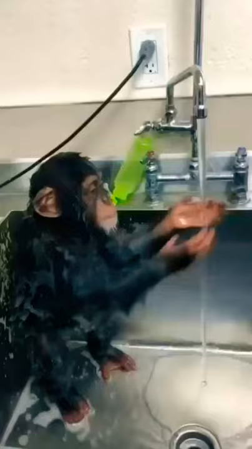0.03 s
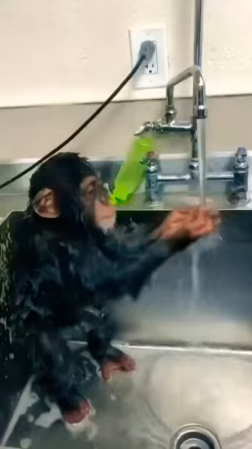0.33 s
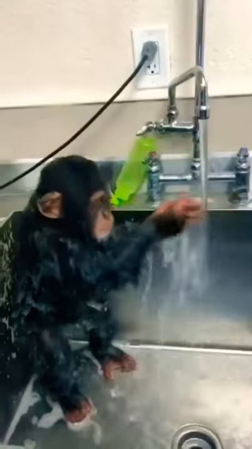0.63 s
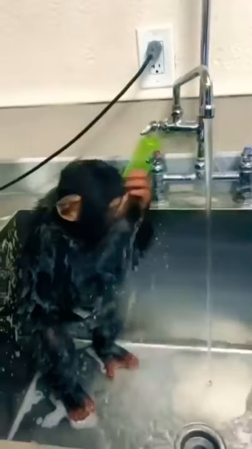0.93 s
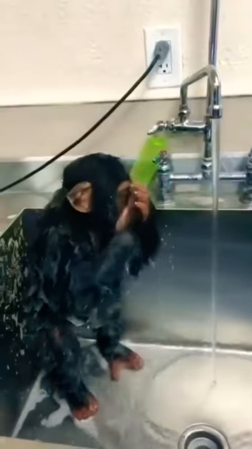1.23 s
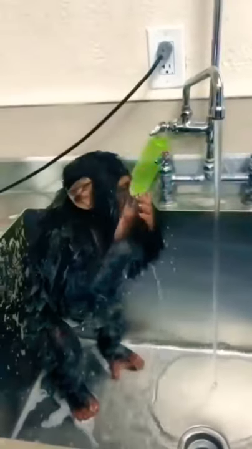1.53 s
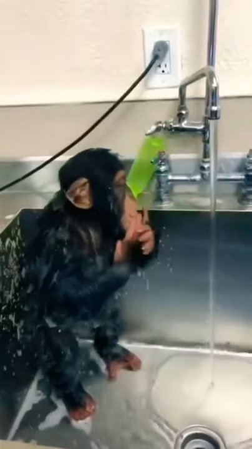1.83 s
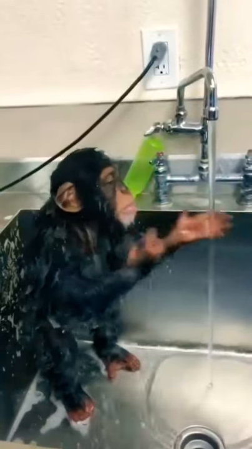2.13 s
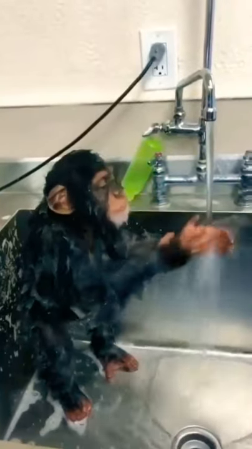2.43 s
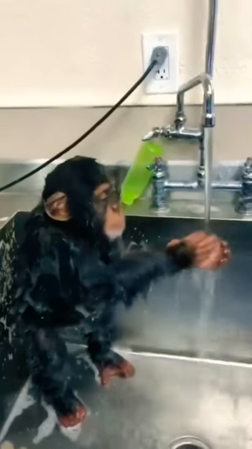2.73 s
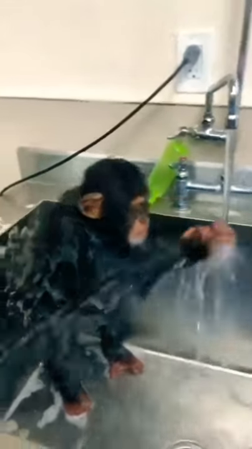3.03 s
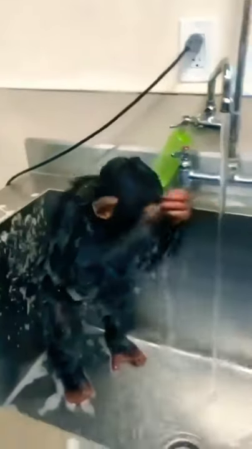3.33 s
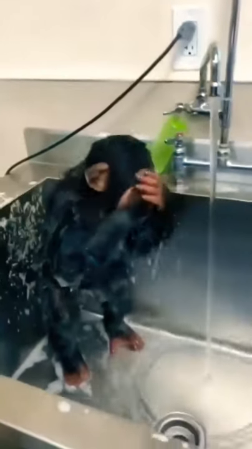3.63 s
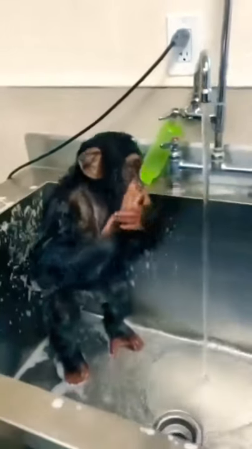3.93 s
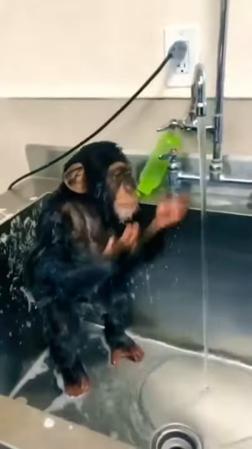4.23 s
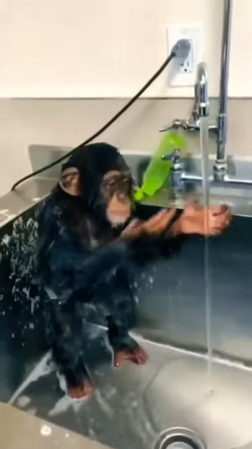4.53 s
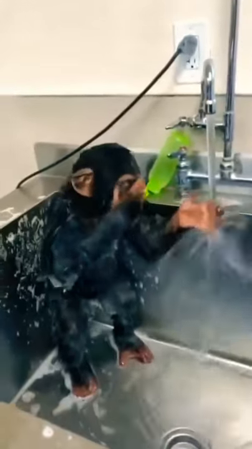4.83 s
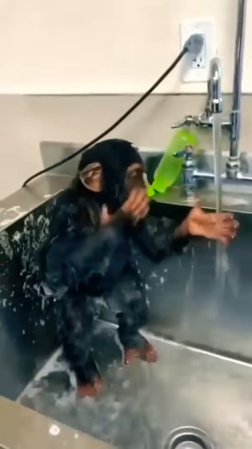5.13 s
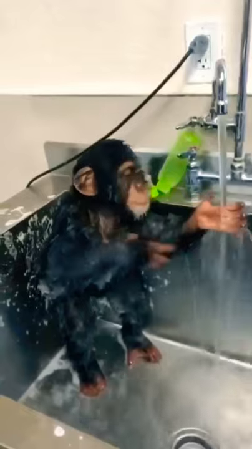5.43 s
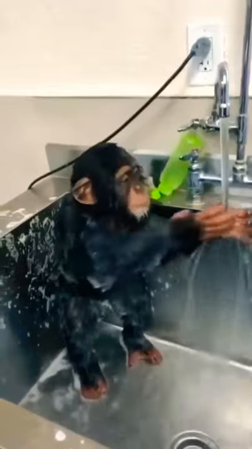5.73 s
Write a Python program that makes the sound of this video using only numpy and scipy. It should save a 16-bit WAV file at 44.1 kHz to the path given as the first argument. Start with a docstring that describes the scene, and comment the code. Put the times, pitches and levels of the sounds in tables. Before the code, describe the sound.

After a brief silence, running tap water starts abruptly at about 0.2 seconds, trickling and gurgling into a large steel sink over a low drumming from the basin. From 0.4 to 1.2 seconds hands break the stream: spray hisses and water patters and thumps on the metal, with sharp plops and a slap around 1 second. The flow then runs more quietly with scattered drips. A second bout of splashing comes from 2.6 to 3.6 seconds, with stronger bubbling, wet splats and booming thuds. Between 3.8 and 5 seconds the water is softer, with small plops and a hollow, wavering gurgle in cupped palms. More splashes and patter follow from 5 seconds to about 5.8, with the tap still running. Everything sounds close, in a small hard room that rings briefly.

```python
"""Tap water drums and trickles in a big steel sink, where a young chimpanzee washes its hands and face.
The stream shakes the basin into a low boom and beats in air bubbles that gurgle in the puddle and in
cupped palms. Whenever the hands break the stream up, spray hisses and falling water patters on the
steel, with plops and splats in between. A small hard room rings briefly."""
import sys
import numpy as np
from scipy import signal
from scipy.io import wavfile
from scipy.ndimage import uniform_filter1d

SR = 44100
rng = np.random.default_rng(int(sys.argv[2]) if len(sys.argv) > 2 else 0)


def generate_wav(sig):
    """Save sig (samples, or channels by samples) to the path in sys.argv[1] as 16-bit PCM at SR."""
    pcm = np.round(np.clip(np.atleast_2d(sig).T, -1, 1) * 32767).astype(np.int16)
    wavfile.write(sys.argv[1], SR, pcm)


N = 254456
TIME = np.arange(N) / SR

# how long the room rings: (frequency [Hz], time to fade by 60 dB [s])
ROOM_RING = [(100, 0.045), (1000, 0.34), (4000, 0.37), (13000, 0.15)]
# ringing tones of the steel basin and its wet bottom panel: (pitch [Hz], width [Hz], relative level [dB])
BASIN_TONES = [(60.3, 29, -22), (81.5, 25, -21), (105.7, 18, 1), (120.8, 24, -2), (130.4, 14.4, -4),
               (145.5, 7.5, -2.5)]
PANEL_TONES = [(138.7, 22, 5), (177, 51, -22), (203, 20, 3.5), (234.3, 4.1, 0.5), (282.4, 27, -2),
               (334.3, 19.5, -0.5), (382, 11.6, -8), (475.5, 12, -3.5), (521.4, 5.7, -4.5), (596, 21, -7.5),
               (737.7, 11.7, -3)]
# tones of the hollow between hands and sink: (pitch [Hz], width [Hz], relative level [dB])
HOLLOW_TONES = [(1310, 110, 0.5), (1780, 93, -1), (1960, 86, -1.5), (2760, 150, 0.5)]
# how loudly that hollow rings: (time [s], level [dB])
HOLLOW_LEVEL = [(3.6, -70), (3.85, -46), (4.3, -41.5), (4.75, -38), (4.95, -38.5), (5.1, -60)]
# tone colour of each water sound: (frequency [Hz], relative level [dB])
TRICKLE_COLOUR = [(150, -30), (450, 2.5), (900, 4), (1500, -1.5), (2400, 0), (3700, -10), (5000, -9),
                  (7000, -23.5), (9000, -10), (13000, -38)]
GURGLE_COLOUR = [(200, -31), (600, -1.5), (900, -2.5), (1300, -0.5), (1900, 2), (2350, -4.5), (2850, -8),
                 (3600, -3.5), (5000, -15.5), (13000, -10.5)]
SPLAT_COLOUR = [(750, -15), (3000, 0.5), (5500, 0.5), (9000, 0), (13000, -3)]
THUMP_COLOUR = [(60, -37), (105, -5), (145, 0.5), (220, -5.5), (330, -13), (1000, -56)]
PATTER_COLOUR = [(25, -15), (100, -4), (190, -11), (350, 0.5), (450, -3.5), (800, -7), (1200, -5),
                 (2500, -22), (6000, -36)]
SPRAY_COLOUR = [(150, -37.5), (700, -8), (1500, -33.5), (2500, -1), (3600, -5.5), (4500, -4), (6000, -3.5),
                (7200, -4.5), (8700, -4), (10500, -5), (13000, -8.5)]
# how hard the stream churns the puddle or the palms: (time [s], relative level [dB])
CHURN_LEVEL = [(0.3, -39.5), (1.15, -34.5), (1.55, -38), (2.1, -40), (2.58, -33), (2.75, -31), (3.2, -32),
               (3.55, -28.5), (3.95, -34.5), (4.45, -39), (4.85, -37.5), (5.1, -34), (5.5, -32),
               (5.75, -37.5)]
# the air pocket that the stream drives into the water: (time [s], pitch [Hz], relative level [dB])
AIR_POCKET = [(0.7, 1380, 5), (1.3, 1610, -36), (1.8, 1330, 13), (2.45, 1400, -21), (2.6, 1030, -5),
              (2.76, 1140, 9), (3.02, 1157, 6), (3.22, 1250, 6), (3.45, 1410, -7), (3.8, 1190, 2.5),
              (4.5, 1350, -7), (4.85, 1230, 2.5), (5.7, 1560, -15)]
# the hands catch the stream and keep it off the basin: (start [s], length [s])
CATCHES = [(0.757, 0.084), (2.82, 0.17), (3.09, 0.07), (5.182, 0.2)]
# large bubbles closing: (time [s], peak level [dB], first pitch [Hz], length [s], pitch rise [share])
PLOPS = [(0.8772, -15, 1570, 0.004, 0.57), (0.9101, -5, 1880, 0.0025, 0.39),
         (0.9113, -5, 3360, 0.0024, 0.21), (0.979, -21, 1350, 0.011, 0.17),
         (1.342, -21, 1450, 0.0055, 0.22), (1.509, -23, 2600, 0.0043, 0.1), (1.715, -28.5, 920, 0.012, 0.1),
         (1.765, -39, 775, 0.013, 0.11), (1.846, -34.5, 445, 0.022, 0.11), (2.005, -27, 3700, 0.0043, 0.11),
         (2.112, -33.5, 1830, 0.03, 0.29), (2.2, -28, 2050, 0.0066, 0.15), (2.204, -23, 1110, 0.009, 0.18),
         (2.366, -30, 2690, 0.018, 0.14), (2.394, -24, 2890, 0.0043, 0.15),
         (2.4032, -15, 1230, 0.0071, 0.46), (2.479, -21, 1510, 0.0073, 0.12),
         (2.5545, -24, 940, 0.013, 0.1), (2.646, -23, 1450, 0.0097, 0.11), (2.663, -28, 974, 0.013, 0.08),
         (2.719, -23, 1120, 0.019, 0.087), (2.912, -23, 2980, 0.0064, 0.083),
         (2.975, -20.5, 1115, 0.021, 0.091), (3.01, -24, 1040, 0.013, 0.1),
         (3.1823, -11, 2710, 0.0018, 0.41), (3.241, -17.5, 4680, 0.006, 0.1),
         (3.256, -16, 1350, 0.0045, 0.22), (3.27, -26, 5000, 0.0046, 0.1),
         (3.39, -20.5, 1364, 0.017, 0.047), (3.4322, -9.5, 3030, 0.0036, 0.2),
         (3.494, -20.5, 1547, 0.019, 0.06), (3.527, -10.5, 2880, 0.003, 0.35),
         (3.565, -19.5, 1084, 0.01, 0.18), (3.605, -15, 3180, 0.0027, 0.2), (3.768, -30, 1200, 0.021, 0.05),
         (3.811, -22, 1193, 0.017, 0.091), (3.824, -17, 1780, 0.0086, 0.21),
         (3.838, -26, 1037, 0.011, 0.089), (3.915, -33, 2620, 0.011, 0.036),
         (4.002, -36, 1930, 0.012, 0.08), (4.02, -29, 1190, 0.017, 0.08), (4.121, -23, 1600, 0.008, 0.097),
         (4.126, -29, 1950, 0.012, 0.08), (4.168, -30, 1545, 0.016, 0.26),
         (4.209, -26.5, 1240, 0.012, 0.13), (4.36, -32, 1190, 0.014, 0.08),
         (4.512, -27, 6300, 0.0028, 0.08), (4.574, -19, 1520, 0.006, 0.26), (4.58, -22, 1370, 0.0068, 0.11),
         (4.5855, -18, 1770, 0.0046, 0.2), (4.722, -26, 1255, 0.022, 0.08),
         (4.742, -21.5, 2695, 0.0084, 0.12), (4.773, -31, 2680, 0.0065, 0.05),
         (4.795, -28, 1696, 0.033, 0.091), (4.819, -27.5, 1073, 0.03, 0.25),
         (5.4073, -10.5, 2480, 0.003, 0.27), (5.411, -16, 4660, 0.0019, 0.1),
         (5.4142, -7, 3470, 0.0016, 0.2), (5.43, -19.5, 1800, 0.0069, 0.37),
         (5.6055, -21, 1650, 0.01, 0.12), (5.6125, -11, 5000, 0.002, 0.1)]
# water slapping on skin and steel: (time [s], level [dB], time to fade by 60 dB [s])
SPLATS = [(0.541, -19.5, 0.026), (0.688, -18, 0.076), (0.714, -24, 0.093), (1.0063, -7, 0.042),
          (1.021, -17.5, 0.13), (1.046, -13.5, 0.028), (1.138, -14.5, 0.039), (1.2356, -29, 0.023),
          (1.271, -24, 0.027), (1.305, -24, 0.079), (1.4711, -24, 0.04), (1.57, -24, 0.018),
          (1.757, -31, 0.04), (2.0, -38, 0.38), (2.214, -35, 0.04), (2.465, -34, 0.098),
          (2.685, -21, 0.066), (2.756, -26, 0.15), (2.823, -14.5, 0.031), (2.909, -14, 0.05),
          (2.94, -17, 0.06), (2.97, -16, 0.082), (2.988, -20.5, 0.09), (3.0294, -26, 0.021),
          (3.0586, -31, 0.038), (3.089, -16.5, 0.04), (3.1775, -19, 0.04), (3.242, -23, 0.1),
          (3.473, -12.5, 0.035), (3.6022, -18, 0.04), (3.645, -14.5, 0.039), (3.7245, -12, 0.012),
          (3.7684, -30, 0.04), (3.8472, -27, 0.057), (3.9325, -25.5, 0.037), (4.082, -26, 0.044),
          (4.0994, -29.5, 0.03), (4.1565, -29.5, 0.05), (4.219, -30, 0.11), (4.3136, -27.5, 0.022),
          (4.5441, -28, 0.033), (4.619, -26, 0.044), (4.727, -26.5, 0.061), (4.825, -31.5, 0.12),
          (4.9795, -14.5, 0.024), (5.2709, -24, 0.027), (5.3757, -23.5, 0.27), (5.407, -12, 0.03),
          (5.426, -14, 0.077), (5.442, -25, 0.046), (5.571, -21, 0.065), (5.6016, -18, 0.062)]
# handfuls spilling into the sink: (start [s], rise [s], length [s], spray [dB], patter [dB], boom [dB])
SPILLS = [(0.343, 0.12, 0.15, -33, -71, -33.5), (0.5, 0.085, 0.25, -29, -35.5, -46),
          (0.812, 0.014, 0.029, -24.5, -43, -49), (0.848, 0.067, 0.23, -26.5, -33.5, -30),
          (1.187, 0.022, 0.088, -35.5, -41, -52), (1.668, 0.022, 0.069, -38.5, -40.5, -119),
          (2.638, 0.096, 0.17, -28.5, -33.5, -43), (2.823, 0.066, 0.25, -27, -37.5, -52),
          (3.151, 0.027, 0.13, -28.5, -39.5, -55), (3.293, 0.031, 0.19, -26.5, -35.5, -30),
          (3.447, 0.03, 0.12, -29.5, -35, -24.5), (4.974, 0.023, 0.13, -26, -29.5, -38),
          (5.197, 0.011, 0.43, -34, -41, -59), (5.412, 0.018, 0.063, -28, -33.5, -43),
          (5.559, 0.02, 0.19, -24.5, -31, -38)]


def gain_of(db):
    """Turns decibels into a factor to multiply by."""
    return 10 ** (np.asarray(db) / 20)


def evened(x):
    """Scales a sound to an average power of 1."""
    return x / np.sqrt(np.mean(x ** 2) + 1e-20)


def read(points, hz):
    """Looks up a table by frequency, spacing the octaves evenly."""
    f, value = np.transpose(points)
    return np.interp(np.log(hz + 1), np.log(f + 1), value)


def curves(rows):
    """Joins the points of a time table into one curve per column."""
    s, *columns = np.transpose(rows)
    return [np.interp(TIME, s, c) for c in columns]


def add(mix, s, sound):
    """Mixes a sound in at time s."""
    part = mix[round(s * SR):][:len(sound)]
    part += sound[:len(part)]


def colour(x, points, size=2048):
    """Gives a sound a tone colour while clicks keep their sharp front."""
    log_gain = np.log(gain_of(read(points, abs(np.fft.fftfreq(size, 1 / SR)))))
    taps = np.fft.ifft(np.exp(np.conj(signal.hilbert(log_gain)))).real
    return evened(signal.oaconvolve(x, taps)[:len(x)])


def ring(x, hz, width, skirt_hz):
    """Makes x ring at a fixed or moving pitch; a second, wider filter trims the sound to either side."""
    turn = np.exp(2j * np.pi * np.cumsum(hz * np.ones(len(x))) / SR)
    for band_hz in (width, skirt_hz):
        decay = np.exp(-np.pi * band_hz / SR)
        x = 2 * (turn * signal.lfilter([1 - decay], [1, -decay], x / turn + 1e-18)).real
    return evened(x)


def impacts(per_s, spread_db):
    """Tiny blows at random times; with a positive spread, most are small and a few are large."""
    size = gain_of(spread_db * np.minimum(rng.exponential(1, N), 4))
    return size * rng.choice([-1, 1], N) * (rng.random(N) < per_s / SR)


def bubble(hz, length, rise):
    """A dying tone whose pitch climbs as the bubble nears the surface."""
    t = np.arange(0, length, 1 / SR)
    fade = gain_of(-60 * t / length) * (1 - np.exp(-2 * hz * t))
    return fade * np.sin(2 * np.pi * hz * (t + rise * t * t / length / 2))


def bubbles(low_hz, high_hz, count, spread_db, cycles, rise):
    """A cloud of bubbles of random sizes, each ringing for about so many cycles."""
    out = np.zeros(N)
    for when, size, strength, damping in rng.random((count, 4)):
        hz = low_hz * (high_hz / low_hz) ** size
        db = -spread_db * np.log(max(strength, .02))
        length = cycles * 2 ** (damping - .5) / hz
        add(out, when * N / SR, gain_of(db) * hz * bubble(hz, length, rise))
    return evened(out)


def steel(tones, skirt):
    """Falling water shakes the steel sheet, which rings at its own pitches."""
    return evened(sum(gain_of(db) * ring(rng.standard_normal(N), hz, width, skirt * width)
                      for hz, width, db in tones))


def echoes(walls_db=-6, wall_s=0.011, tail_db=-8):
    """The direct sound from one spot, close echoes off the sink walls, then the room's short tail."""
    t = np.arange(SR // 3) / SR
    signs = rng.choice([-1., 1.], (2, len(t)))
    near, far = signs * (rng.random((2, len(t))) < 2000 / SR) * (t > .002)
    near = near * np.exp(-t / wall_s)
    hz, frame_s, bands = signal.stft(far, SR, nperseg=256)
    fade = gain_of(-60 * frame_s / read(ROOM_RING, hz)[:, None])
    far = signal.istft(bands * fade, SR)[1][:len(t)]
    walls = gain_of(walls_db) * near / np.linalg.norm(near)
    tail = gain_of(tail_db) * far / np.linalg.norm(far)
    paths = (t == 0) + walls + tail
    return paths / np.linalg.norm(paths)


def room(x, spots=8, stay_samples=768):
    """Water lands on several spots in turn, each with its own echoes."""
    spot = np.arange(N) // stay_samples % spots
    shares = (uniform_filter1d(1. * (spot == k), stay_samples // 4) for k in range(spots))
    return sum(signal.oaconvolve(x * share, echoes())[:N] for share in shares)


def trickle(crackle_db=-45.5, spit_db=-56, hiss_db=-54, ping_db=-54):
    """The unbroken stream crackles, spits and hisses on the wet sink; tiny drops ping in the puddle."""
    crackle = gain_of(crackle_db) * colour(impacts(per_s=3000, spread_db=3), TRICKLE_COLOUR)
    spits = gain_of(spit_db) * colour(impacts(per_s=45, spread_db=1.5), SPLAT_COLOUR)
    hiss = gain_of(hiss_db) * colour(rng.standard_normal(N), SPLAT_COLOUR)
    pings = bubbles(low_hz=2500, high_hz=9800, count=600, spread_db=3, cycles=100, rise=0.175)
    return crackle + spits + hiss + gain_of(ping_db) * colour(pings, TRICKLE_COLOUR)


def hollow(skirt=4.5, waver=0.028):
    """The stream rings the hollow between hands and sink; its pitch wavers as the hands move."""
    wander = uniform_filter1d(uniform_filter1d(rng.standard_normal(N), SR // 20), SR // 40)
    drift = 1 + waver * evened(wander)
    blows = impacts(per_s=760, spread_db=3.5)
    rings = sum(gain_of(db) * ring(blows, hz * drift, width, skirt * width)
                for hz, width, db in HOLLOW_TONES)
    level_db, = curves(HOLLOW_LEVEL)
    return gain_of(level_db) * evened(rings)


def drumming(level_db):
    """The stream pushes evenly on the basin, so its boom flutters quickly but follows the given level."""
    boom = steel(BASIN_TONES, skirt=1.97)
    swell = np.sqrt(abs(uniform_filter1d(boom ** 2, SR // 8)) + 1e-9)
    return gain_of(level_db) * evened(boom / swell)


def gurgle(trim_db=-1.5, froth_db=-2.5, notes_db=-9.5, pocket_trim_db=-11):
    """The stream beats in bubbles, froth and an air pocket that changes size with the cupped palm."""
    cloud = bubbles(low_hz=455, high_hz=4690, count=3600, spread_db=3.5, cycles=72, rise=0.17)
    notes = bubbles(low_hz=943, high_hz=2698, count=260, spread_db=1, cycles=100, rise=0.22)
    froth = colour(impacts(per_s=2900, spread_db=4.5), GURGLE_COLOUR)
    bubbling = evened(colour(cloud, GURGLE_COLOUR) + gain_of(notes_db) * notes + gain_of(froth_db) * froth)
    pocket_hz, pocket_db = curves(AIR_POCKET)
    pocket = ring(impacts(per_s=280, spread_db=4), pocket_hz, width=80, skirt_hz=280)
    share = gain_of(pocket_db + pocket_trim_db)
    level_db, = curves(CHURN_LEVEL)
    return gain_of(level_db + trim_db) * (bubbling + share * pocket) / np.sqrt(1 + share ** 2)


def plop(hz, length, rise):
    """A pocket of air pinches off: its tone swells, climbs and is gone."""
    progress = np.arange(0, length, 1 / SR) / length
    swell = np.sin(np.pi * progress ** .7) ** 1.5
    return swell * np.sin(2 * np.pi * hz * length * (progress + rise * progress ** 2 / 2))


def plops(shed_count=7, shed_db=-17, shed_s=0.022, shed_cycles=49, scatter_octaves=0.533):
    """Large bubbles plop; each sheds weaker bubbles of other sizes, and the small ones die sooner."""
    out = np.zeros(N)
    for s, db, hz, length, rise in PLOPS:
        add(out, s, gain_of(db) * plop(hz, length, rise))
        for lag, size in rng.random((shed_count, 2)):
            shed_hz = hz * (1 + rise / 2) * 2 ** (scatter_octaves * (2 * size - 1))
            shed = bubble(shed_hz, shed_cycles / shed_hz, rise=0.44)
            add(out, s + length / 2 + lag * shed_s, gain_of(db + shed_db) * shed)
    return out


def splats(rise_s=0.0007):
    """Each lump of water bursts into a quickly fading shower of droplets."""
    out = np.zeros(N)
    shower = colour(impacts(per_s=15000, spread_db=-1), SPLAT_COLOUR)
    t = np.arange(SR // 6) / SR
    for s, db, fade_s in SPLATS:
        burst = shower[round(s * SR):][:len(t)]
        fade = gain_of(-60 * t / fade_s) * (1 - np.exp(-t / rise_s))
        add(out, s, gain_of(db) * burst * fade[:len(burst)])
    return out


def catch_dip(depth_db=-8, fade_s=0.025):
    """The dip in dB of the stream's boom while the hands keep it off the basin."""
    return depth_db * sum(np.clip(np.minimum(TIME - start, start + length - TIME) / fade_s + .5, 0, 1)
                          for start, length in CATCHES)


def spilling(levels_db, fall_db_per_s, dribble_db=-8, dribble_db_per_s=36):
    """The power of all spills: each rises, holds and falls away, and the wet fur dribbles on."""
    power = np.zeros(N)
    for (start, rise, length, *_), db in zip(SPILLS, levels_db):
        onset = np.clip((TIME - start) / rise, 0, 1)
        after = np.maximum(TIME - start - length, 0)
        fade_db = np.maximum(-fall_db_per_s * after, dribble_db - dribble_db_per_s * after)
        power += (onset * gain_of(db + fade_db)) ** 2
    return power


def with_stream(spill_power, stream_db):
    """Level in dB of the spills and the stream together."""
    return 10 * np.log10(gain_of(stream_db) ** 2 + spill_power)


def thumps(boom_power, trim_db=-8.5):
    """A whole handful lands in heavy lumps that thump the steel."""
    lumps = colour(impacts(per_s=500, spread_db=0), THUMP_COLOUR)
    return gain_of(trim_db) * np.sqrt(boom_power) * lumps


def patter(level_db, thud_db=-4):
    """Falling water thuds on the bottom panel and makes it ring."""
    thuds = colour(impacts(per_s=700, spread_db=2.5), PATTER_COLOUR)
    return gain_of(level_db) * (steel(PANEL_TONES, skirt=3.3) + gain_of(thud_db) * thuds)


def spray(level_db, tick_db=-6, fizz_db=-4, ring_db=-9, mist_db=2, clump_db=3, clump_s=0.022):
    """Droplets tick, larger ones ring, tiny bubbles fizz and mist hisses, all arriving in clumps."""
    ticks = evened(impacts(per_s=2500, spread_db=4))
    fizz = bubbles(low_hz=1862, high_hz=14060, count=5500, spread_db=-3, cycles=27, rise=0.034)
    rings = bubbles(low_hz=3000, high_hz=12050, count=1100, spread_db=2, cycles=70, rise=0.085)
    clumps = evened(signal.lfilter([1], [1, -np.exp(-1 / (clump_s * SR))], rng.standard_normal(N)))
    mist = gain_of(mist_db) * rng.standard_normal(N)
    drops = gain_of(tick_db) * ticks + gain_of(fizz_db) * fizz + gain_of(ring_db) * rings + mist
    return gain_of(level_db) * colour(drops * gain_of(clump_db * clumps), SPRAY_COLOUR)


def scene():
    """The splashing in its room, over the patter and boom of the basin."""
    *_, sprays, patters, booms = np.transpose(SPILLS)
    spray_db = with_stream(spilling(sprays, fall_db_per_s=108), stream_db=-44.5)
    patter_db = with_stream(spilling(patters, fall_db_per_s=71), stream_db=-44)
    boom_power = spilling(booms, fall_db_per_s=69)
    drum_db = with_stream(boom_power, stream_db=-31 + catch_dip())
    water = trickle() + gurgle() + hollow() + spray(spray_db) + plops() + splats()
    return (room(water) + patter(patter_db) + drumming(drum_db) + thumps(boom_power))[None]


def record(dry):
    """The sound starts abruptly after a short silence; the highest treble is cut off."""
    start_s, fade_in_s, top_hz = 0.2225, 0.0025, 13350
    opened = dry * np.clip((TIME - start_s) / fade_in_s, 0, 1)
    treble_cut = signal.firwin(601, top_hz, window=("kaiser", 9), fs=SR)
    return signal.oaconvolve(opened, treble_cut[None], "same")


dry = scene()
out = record(dry)
generate_wav(out)
```